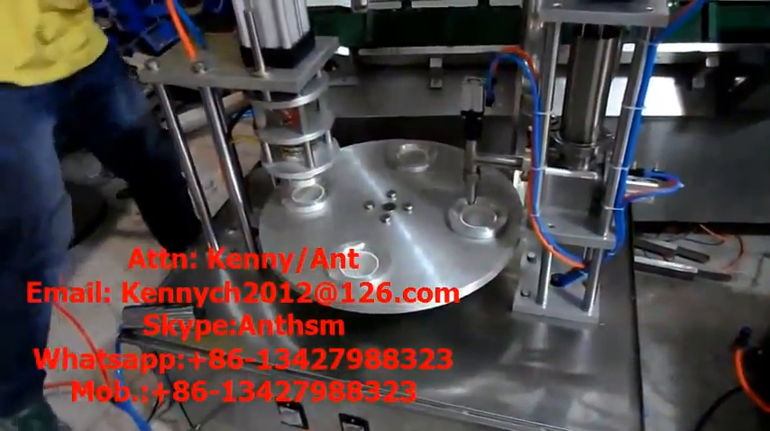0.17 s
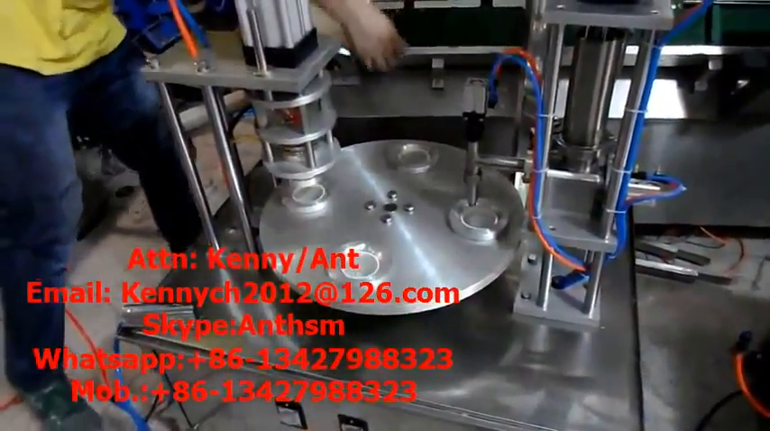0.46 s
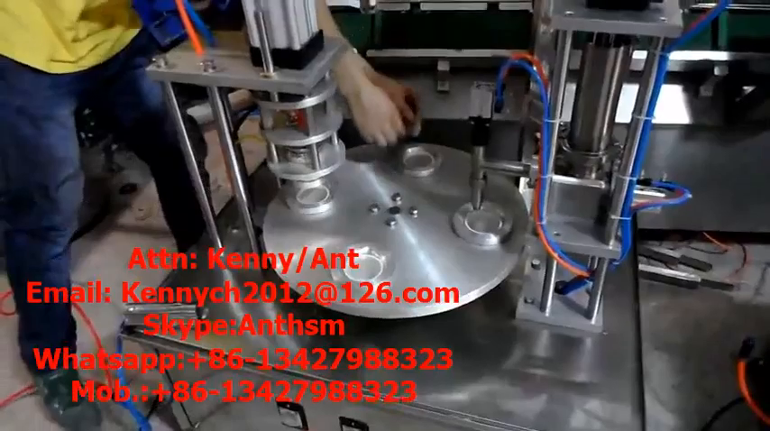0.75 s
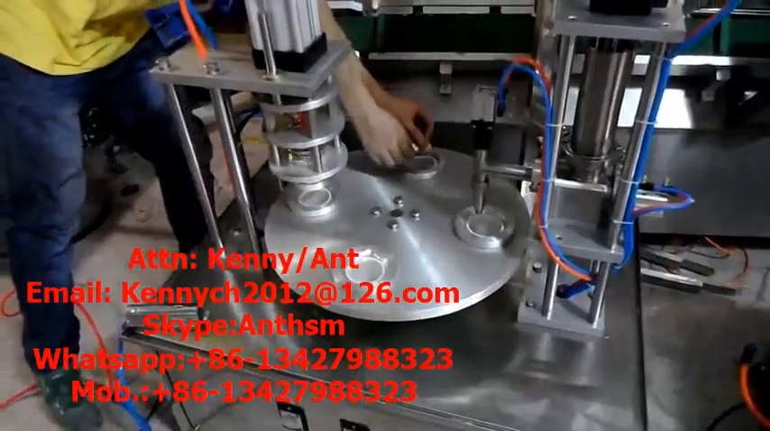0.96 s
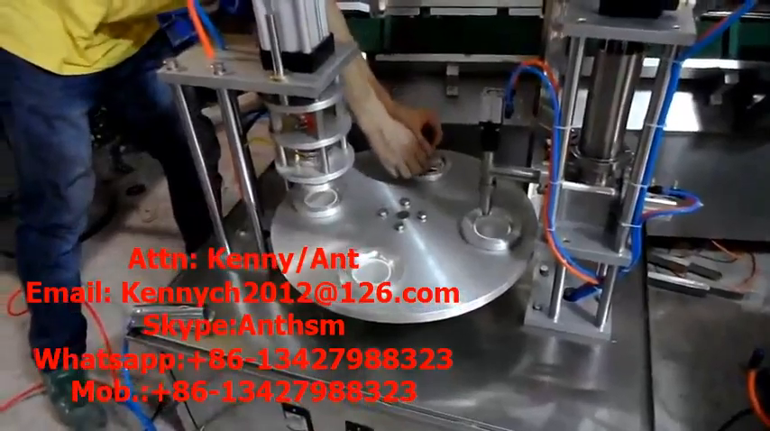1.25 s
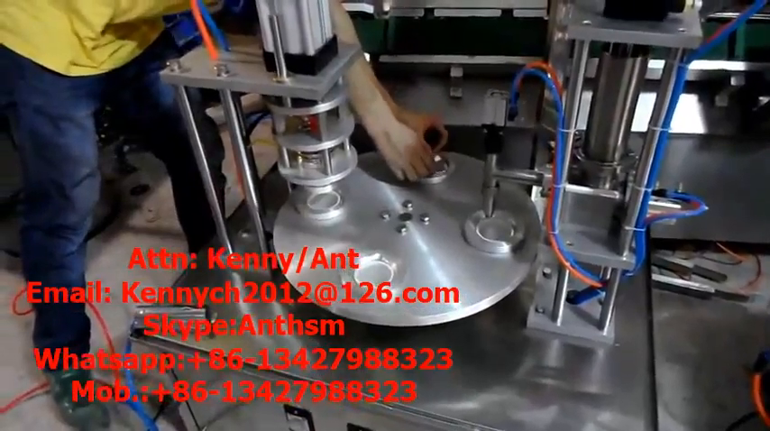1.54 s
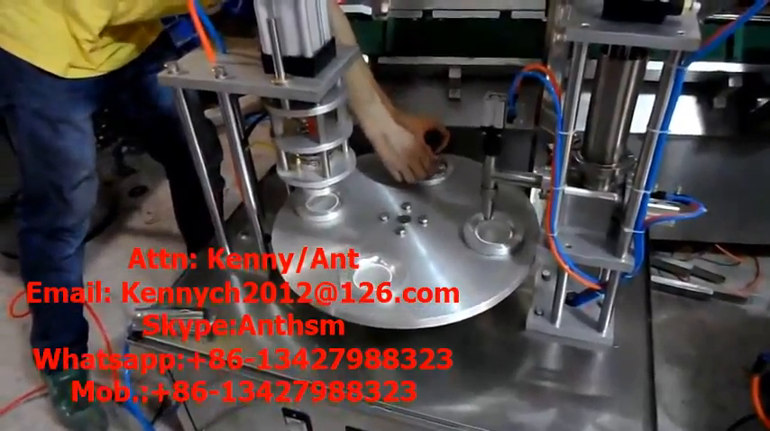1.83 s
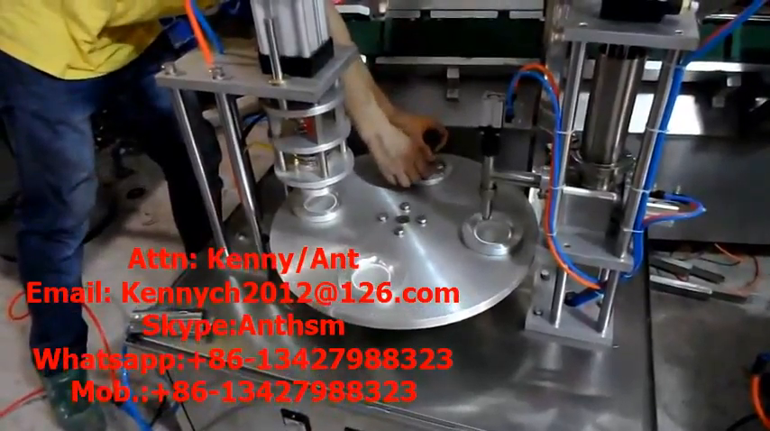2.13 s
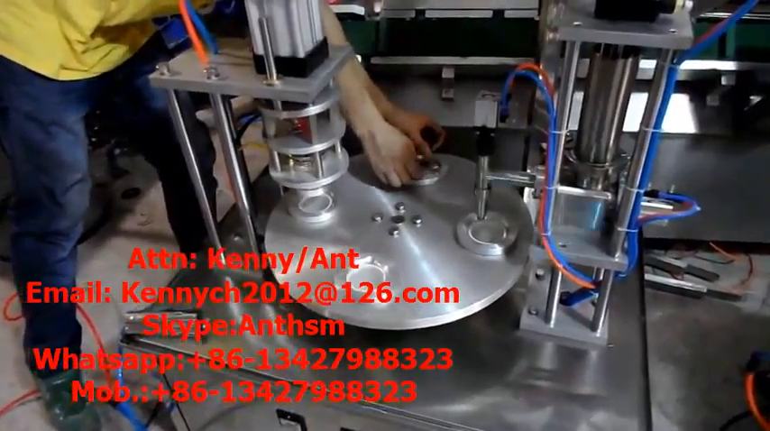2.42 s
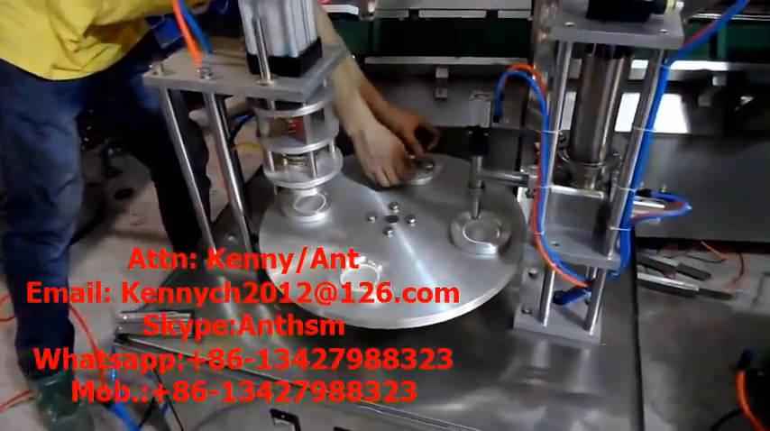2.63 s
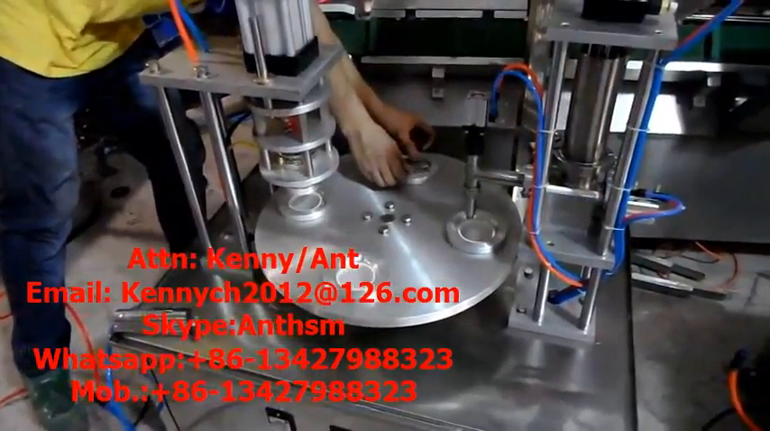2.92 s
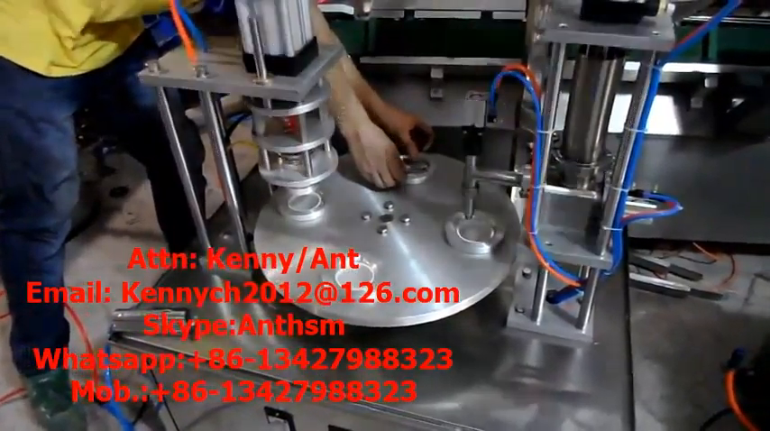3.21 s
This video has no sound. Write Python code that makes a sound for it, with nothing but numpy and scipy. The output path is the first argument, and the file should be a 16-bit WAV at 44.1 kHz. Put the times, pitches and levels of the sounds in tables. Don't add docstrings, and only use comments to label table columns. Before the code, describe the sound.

A packing machine hums over broad workshop roar; a cup clinks, soft blows knock the table, air puffs twice, then the drive swells and whines on. Echoing hall, fairly close microphone, dull top end.

```python
import sys
import numpy as np
from scipy import signal
from scipy.fft import rfft, irfft, next_fast_len
from scipy.io import wavfile
from scipy.ndimage import uniform_filter1d, map_coordinates

SR = 44100
rng = np.random.default_rng(int(sys.argv[2]) if len(sys.argv) > 2 else 0)


def file_out(sig):
    cols = np.atleast_2d(sig).T
    lim = np.clip(cols, -1, 1)
    pcm = np.round(lim * 32767).astype(np.int16)
    wavfile.write(sys.argv[1], SR, pcm)


def magnitude_from_level(level_db):
    exponent = np.asarray(level_db, float) / 20
    return 10 ** exponent


N = 148176
T = np.arange(N) / SR

HUM_HZ = 399.9
SHOP_DB, HALL_DB = -27.5, -18
DULLING = 1.77

# time in seconds, hum in dB, whine in dB, drive roar in dB.
DRIVE_COURSE = [(0, -33, -37, -28.5), (.3, -36.5, -47, -31), (.45, -30, -30, -34), (.85, -27, -30, -33),
                (1.1, -30.5, -35, -28.5), (1.2, -25, -26.5, -22.5), (1.45, -25.5, -25, -24),
                (1.7, -30.5, -27, -23), (1.79, -30, -28.5, -23.5), (1.85, -21.5, -26.5, -23.5),
                (1.92, -38, -28, -23.5), (2.0, -25, -29, -21), (2.12, -30.5, -25, -22.5),
                (2.3, -25.5, -26.5, -23.5), (2.7, -28.5, -25.5, -23), (3.1, -25, -31.5, -23.5),
                (3.22, -30, -27.5, -24), (3.36, -30, -28.5, -22)]
# multiple of 399.9 Hz, level in dB.
WHINE_HARMONICS = [(2, -4.5), (3, -15.5), (5, -5.5)]
# centre in Hz, width in Hz, level in dB.
COMPRESSOR_BANDS = [(131.8, 6.6, -44), (192.4, 14, -36.5), (260.4, 7.7, -40.5), (324.3, 7, -39.5),
                    (403, 30, -30.5)]
# frequency in Hz, level in dB.
PISTON_TONES = [(131.2, -41.5), (261.8, -40)]
# frequency in Hz, density in dB per Hz.
SHOP_SPECTRUM = [(25, -14), (100, -12), (260, -5), (700, -7), (2000, -16), (4300, -23), (5600, -32),
                 (11000, -36.5), (13000, -39)]
# frequency in Hz, density in dB per Hz.
DRIVE_SPECTRUM = [(25, -33), (300, -11.5), (800, -9.5), (2000, -11.5), (3300, -19), (4300, -20),
                  (5600, -30), (10500, -39.5), (13000, -50.5)]
# start in seconds, level in dB, rattle length in seconds.
CLINKS = [
    (0.03, -30, 0.049),
    (3.055, -48, 0.071),
    (1.185, -32, 0.019),
    (1.212, -22, 0.025),
]
# frequency in Hz, width in Hz, level in dB, T60 in seconds.
CUP_MODES = [
    [(4210, 78, -5, 0.47), (6410, 140, -5.5, 0.63), (7410, 30, -5.5, 0.69), (8680, 51, -16, .3),
     (9690, 150, -22, .4), (10740, 200, -17, 0.66), (11030, 63, -18, 0.43), (11700, 30, -26, 0.22),
     (12320, 30, -26, .2), (12760, 30, -23, .15)],
    [(4800, 60, -8, .15), (6270, 33, 8, 0.19), (10790, 90, -11, .1), (11060, 97, -1, .1)],
    [(3150, 150, -2, .15), (4000, 120, 2, .15)],
    [(2170, 50, 1.5, 0.16), (3770, 140, -13, .2), (1150, 83, -5, 0.52)],
]
# start in seconds, level in dB, gain of the upper modes in dB, rise in seconds.
KNOCKS = [
    (.076, -20.5, 7.5, 0.00088),
    (.092, -35, -11.5, 0.0046),
    (.168, -16, -1, .001),
    (.181, -3, -7, 0.0066),
    (1.755, -12, -3, 0.0033),
]
# frequency in Hz, level in dB, T60 in seconds.
TABLE_MODES = [(786, 5.5, 0.038), (1054, -1, 0.063), (1510, -4.5, 0.023), (934, -4, 0.023)]
# start in seconds, attack in seconds, hold in seconds, peak in dB, T60 in seconds.
PUFFS = [
    (0.409, 0.063, 0.13, -19.5, 1.38),
    (1.097, 0.071, .05, -21.5, 1),
]
# frequency in Hz, density in dB per Hz.
JET_SPECTRA = [
    [(100, -20), (400, -11), (1200, -5.5), (3500, -11.5), (6000, -19.5), (9500, -30), (12000, -51)],
    [(100, -5), (450, 5.5), (1200, -7), (2100, -3), (3900, -6), (4700, -21), (9500, -33), (12000, -64)],
]
# frequency in Hz, width in Hz, level in dB.
FRAME_MODES = [
    [(840, 30, -2), (1030, 14, 1), (1247, 14, 1), (1410, 18, 1), (1500, 16, -1), (1884, 9, 0),
     (2110, 14, -3), (2580, 12, -3), (2720, 14, -7), (2907, 14, -6), (3200, 10, -4), (3478, 9, -3)],
    [(760, 25, 0), (1150, 40, -2), (1230, 25, -2), (2140, 30, 0), (2730, 40, -10), (3300, 40, -9),
     (3690, 26, -10), (3900, 37, -9)],
]
FRAME_DB = [-2, -7]
# frequency in Hz, T60 in seconds.
HALL_DECAY = [(200, .9), (2000, 1), (10000, 0.13)]
# frequency in Hz, threshold in dB relative to the mid band.
MIDDLE_GATE = [(3000, -46), (8000, -43), (9500, -35), (10500, -31.5), (11500, -26.5), (13000, -24)]
# frequency in Hz, threshold in dB relative to the neighbouring bands.
NEIGHBOUR_GATE = [(4000, -16), (6000, -10), (8000, -4.5), (9500, -1.5), (11000, 0), (13000, 2)]


def unit(x):
    return x / np.sqrt(np.mean(x ** 2) + 1e-20)


def along(points, hz):
    f, value = np.transpose(points)
    return np.interp(np.log(hz + 1), np.log(f + 1), value)


def wobble(rate):
    return map_coordinates(rng.standard_normal(N // 200), [T * rate])


def filtered(x, response):
    m = next_fast_len(N + 8192)
    return irfft(rfft(x, m) * response(np.fft.rfftfreq(m, 1 / SR)), m)[:N]


def rush(spectrum, patchy_db):
    z = signal.stft(rng.standard_normal(N + 512), nperseg=512)[2]
    field = uniform_filter1d(rng.standard_normal(z.shape), 5, 0)
    field = unit(uniform_filter1d(field, 12, 1))
    x = signal.istft(z * magnitude_from_level(patchy_db * field), nperseg=512)[1][:N]
    return unit(filtered(x, lambda hz: magnitude_from_level(along(spectrum, hz))))


def ringing(peaks):
    def response(f):
        total = 0
        for k, (centre, width, db) in enumerate(peaks):
            damping = 1j * f * width
            total = total + (-1) ** k * magnitude_from_level(db) * damping / (centre ** 2 - f ** 2 + damping)
        return total
    return unit(filtered(rng.standard_normal(N), response))


def sine(hz, phase):
    return np.sqrt(2) * np.sin(2 * np.pi * hz * T + phase)


def drive_course(column):
    columns = np.transpose(DRIVE_COURSE)
    return np.interp(T, columns[0], columns[column])


def mains_hum():
    def line(multiple, flutter_db):
        return magnitude_from_level(flutter_db * wobble(11)) * sine(multiple * HUM_HZ, multiple)
    whine = sum(magnitude_from_level(db) * line(multiple, 0.99) for multiple, db in WHINE_HARMONICS)
    return magnitude_from_level(drive_course(1)) * line(0.99, 2.3) + magnitude_from_level(drive_course(2)) * whine


def compressor():
    whine_db = drive_course(2)
    bands = sum(magnitude_from_level(db) * ringing([(hz, width, 0)]) for hz, width, db in COMPRESSOR_BANDS)
    sway = 2.4 * np.sin(2.83 * T)
    tones = sum(magnitude_from_level(db) * sine(hz, sway) for hz, db in PISTON_TONES)
    return magnitude_from_level(0.5 * (whine_db - whine_db.max())) * (bands + tones)


def shop_roar():
    return magnitude_from_level(SHOP_DB + 0.17 * wobble(3.7)) * rush(SHOP_SPECTRUM, patchy_db=-0.2)


def drive_roar():
    return magnitude_from_level(drive_course(3) + 0.15 * wobble(14)) * rush(DRIVE_SPECTRUM, patchy_db=1.0)


def clinks():
    out = np.zeros(N)
    for (start, db, length), modes in zip(CLINKS, CUP_MODES):
        onset = np.clip((T - start) / 0.014, 0, 1)
        free = np.clip(T - start - length, 0, None)
        for hz, width, level, t60 in modes:
            out += onset * magnitude_from_level(db + level - 60 * free / t60) * ringing([(hz, width, 0)])
    return filtered(out, lambda hz: 1 / (1 + (900 / (hz + 1)) ** 6))


def knocks():
    out, t = np.zeros(N + SR), T[:SR // 4]
    for start, db, upper_db, rise in KNOCKS:
        ring = np.zeros(len(t))
        for k, (hz, level, t60) in enumerate(TABLE_MODES):
            share = upper_db * (k > 0)
            ring += magnitude_from_level(level + share - 60 * t / t60) * np.sin(2 * np.pi * hz * t)
        out[round(start * SR):][:len(t)] += magnitude_from_level(db) * ring * (1 - np.exp(-t / rise))
    return out[:N]


def puffs():
    out = np.zeros(N)
    for (start, attack, hold, db, t60), jet, frame, ring_db in zip(PUFFS, JET_SPECTRA, FRAME_MODES, FRAME_DB):
        rise = np.clip((T - start) / attack, 0, 1) ** 1.6
        late_rise = np.clip((T - start - 0.03) / attack, 0, 1) ** 0.43
        loss_db = 60 / t60 * np.clip(T - start - attack - hold, 0, None)
        air = rush(jet, patchy_db=1.6)
        hiss = filtered(air, lambda hz: 1 / (1 + (3500 / (hz + 1)) ** 4))
        body = rise * magnitude_from_level(-loss_db) * (air - hiss + magnitude_from_level(ring_db) * ringing(frame))
        treble = late_rise * magnitude_from_level(-DULLING * loss_db) * hiss
        out += magnitude_from_level(db + 0.19 * wobble(28.8)) * (body + treble)
    return out


def hall(x):
    hz, t, z = signal.stft(rng.standard_normal(SR), SR, nperseg=256)
    decay = magnitude_from_level(-60 * t / along(HALL_DECAY, hz)[:, None])
    tail = signal.istft(z * decay, SR, nperseg=256)[1]
    delayed = np.pad(x, (500, 0))
    return signal.fftconvolve(delayed, tail / np.linalg.norm(tail))[:N]


def gated(x):
    window, lead = np.sin(np.pi * (np.arange(2048) + 0.5) / 2048), 744
    hz, _, z = signal.stft(np.pad(x, (lead, 0)), SR, window, nperseg=2048)
    power = abs(z) ** 2
    middle = uniform_filter1d(power[(hz > 500) & (hz < 3000)].mean(0), size=3)
    neighbours = uniform_filter1d(power, size=60, axis=0)
    threshold = middle * magnitude_from_level(2 * along(MIDDLE_GATE, hz))[:, None]
    threshold = threshold + neighbours * magnitude_from_level(2 * along(NEIGHBOUR_GATE, hz))[:, None]
    frame_db = 2.0 * rng.standard_normal(z.shape[1])
    band_db = 5.6 * uniform_filter1d(rng.standard_normal(z.shape), size=5, axis=0)
    keep = uniform_filter1d(power, size=4, axis=0) > magnitude_from_level(frame_db + band_db) * threshold
    return signal.istft(z * keep, SR, window, nperseg=2048)[1][lead:lead + N]


def scene():
    near = knocks() + clinks()
    machine = mains_hum() + compressor() + drive_roar() + shop_roar()
    return (machine + puffs() + near + magnitude_from_level(HALL_DB) * hall(near))[None]


def top_cut(x):
    return signal.sosfilt(signal.butter(12, 12740, fs=SR, output="sos"), x)


def record(dry):
    mix = gated(dry[0])[None]
    return top_cut(mix)


dry = scene()
out = record(dry)
file_out(out)
```